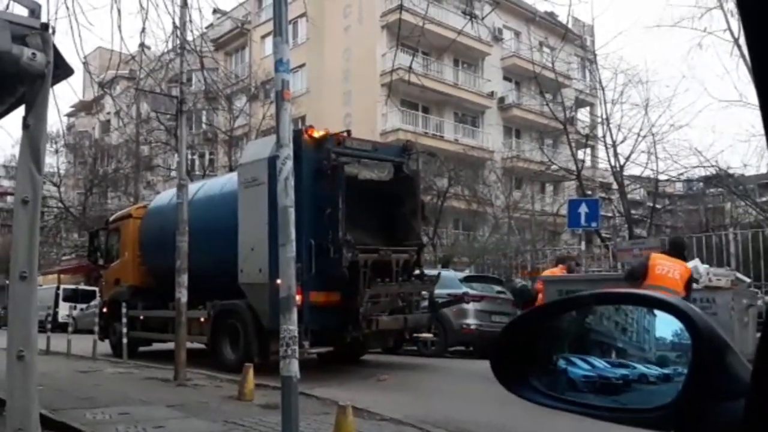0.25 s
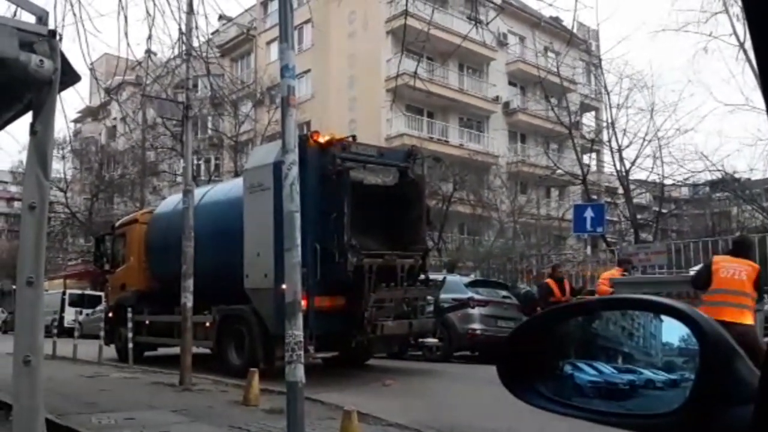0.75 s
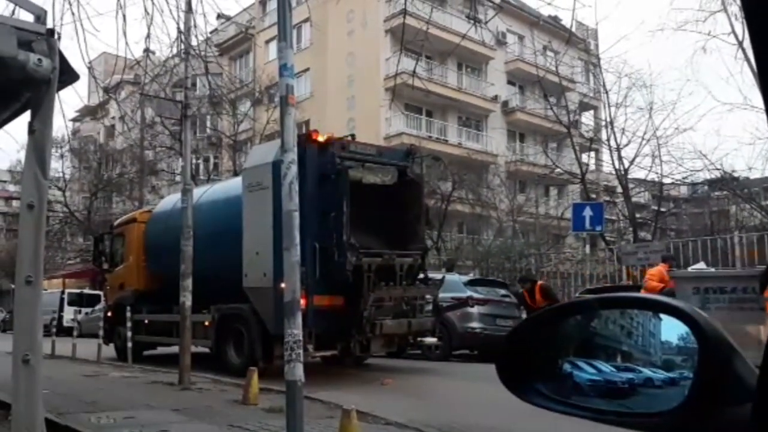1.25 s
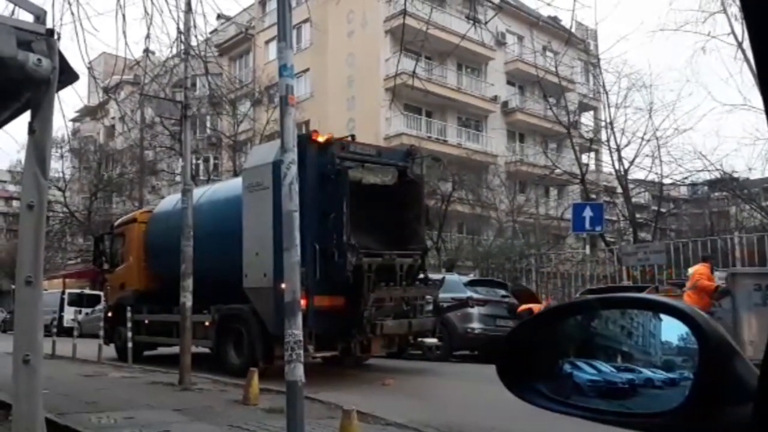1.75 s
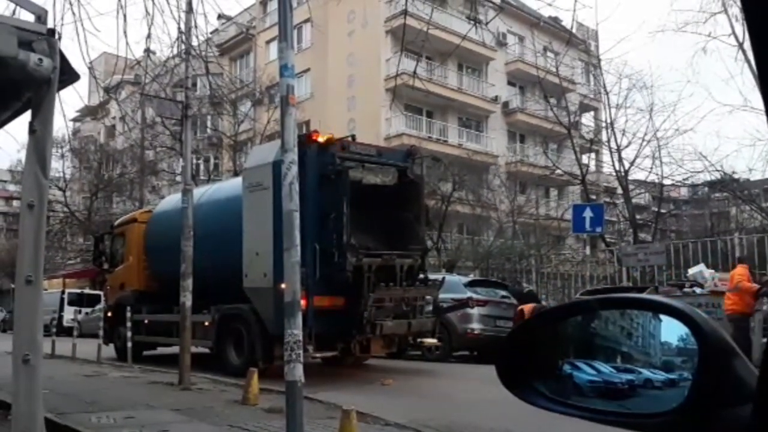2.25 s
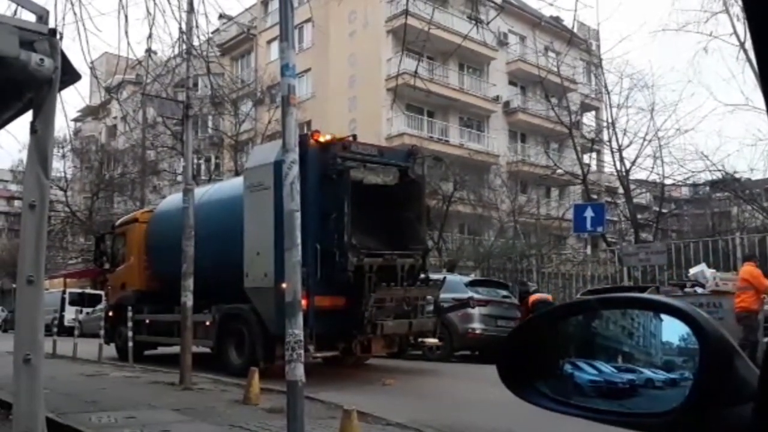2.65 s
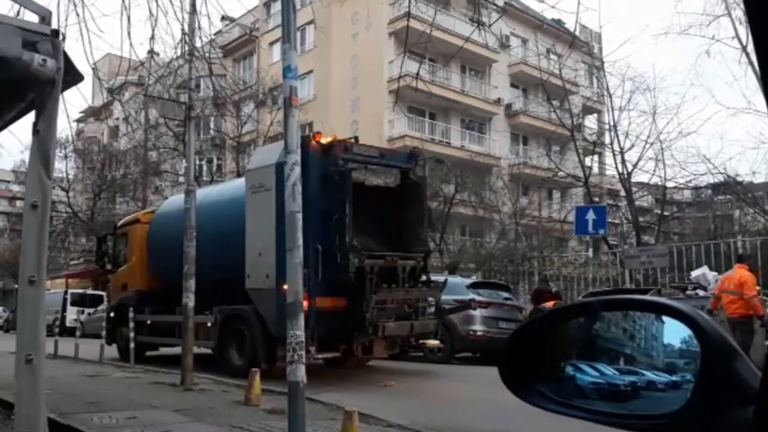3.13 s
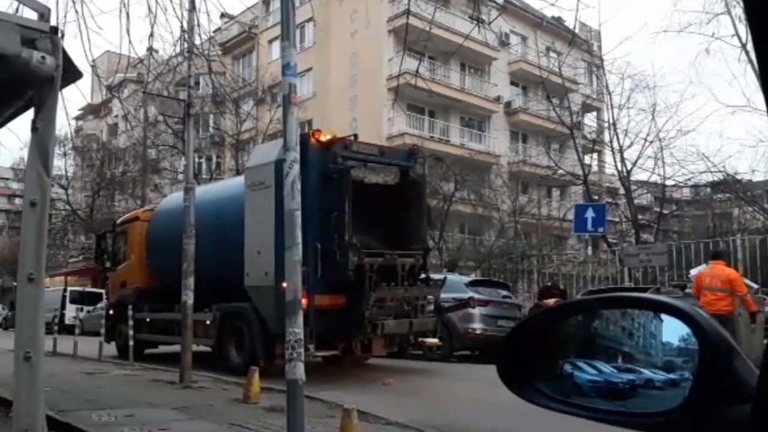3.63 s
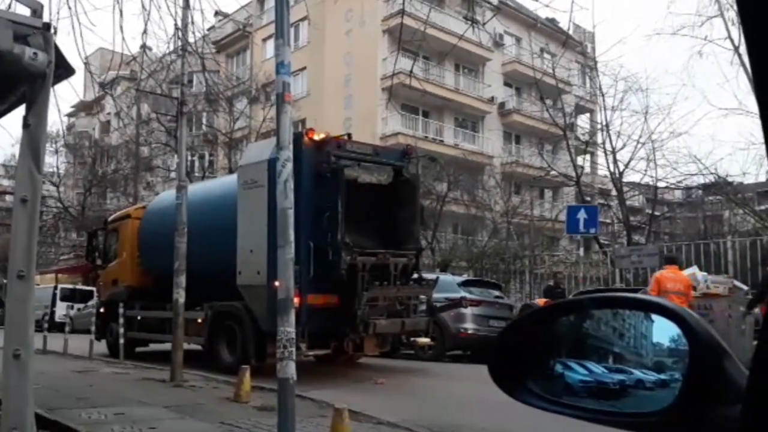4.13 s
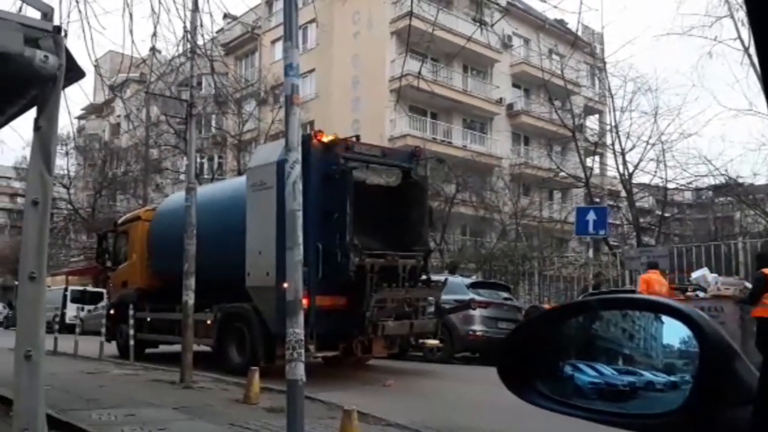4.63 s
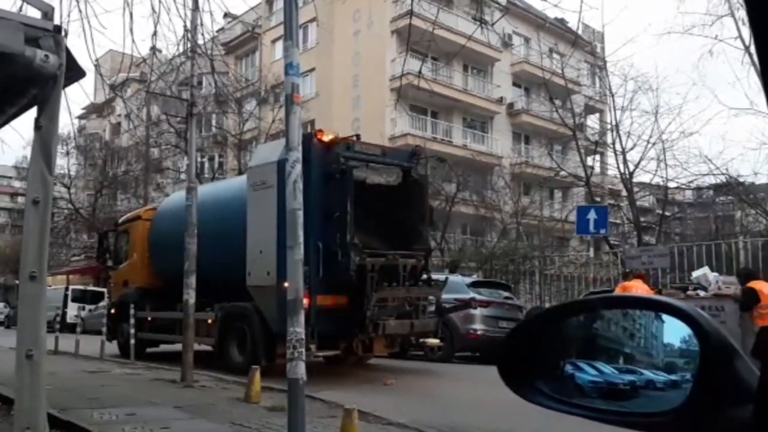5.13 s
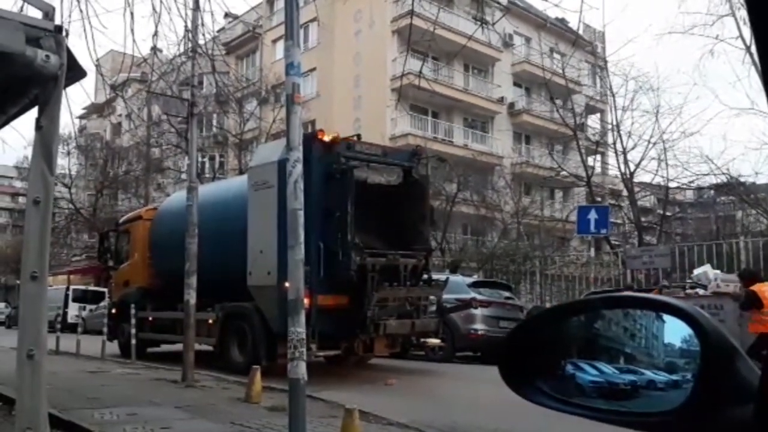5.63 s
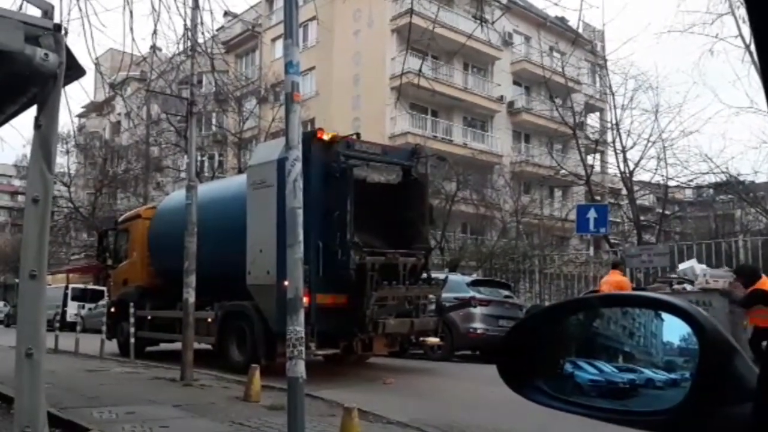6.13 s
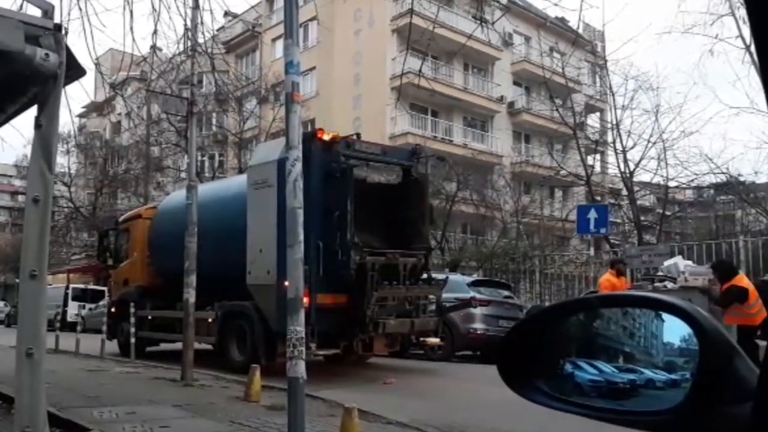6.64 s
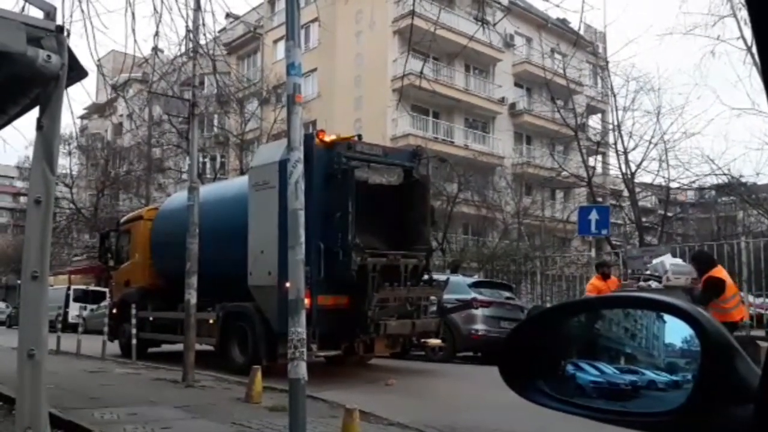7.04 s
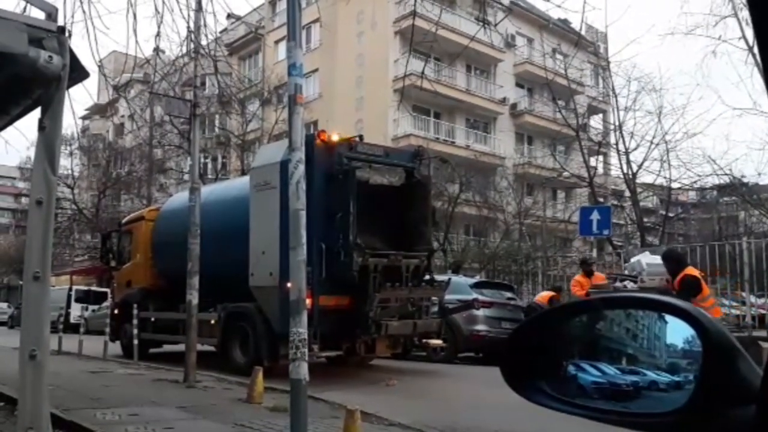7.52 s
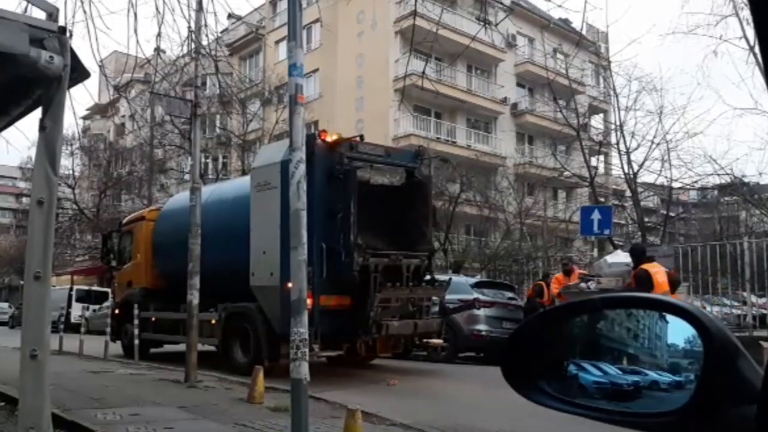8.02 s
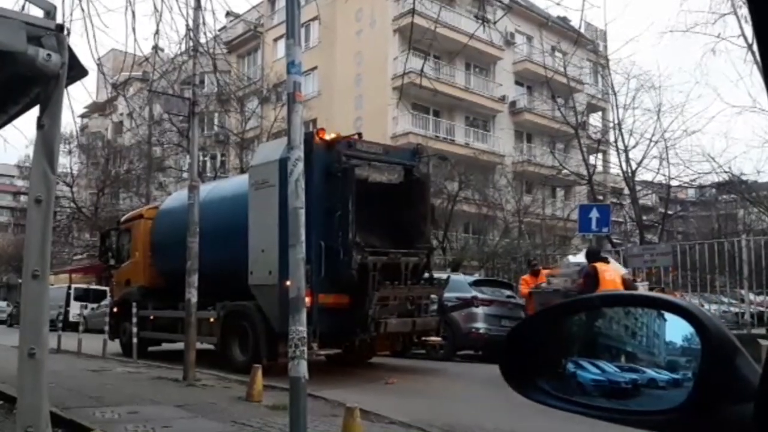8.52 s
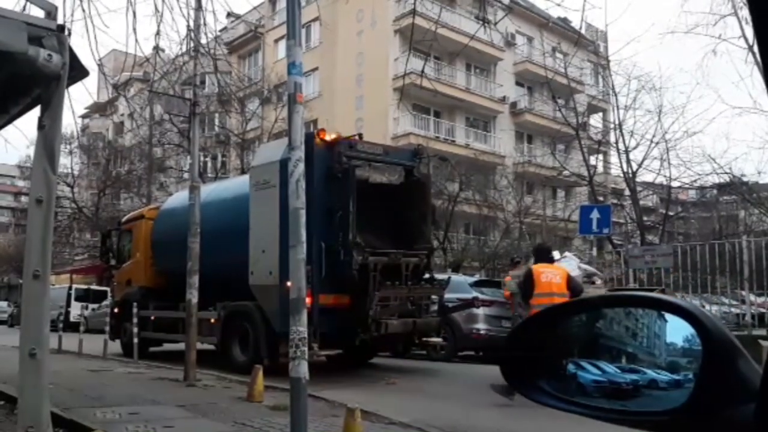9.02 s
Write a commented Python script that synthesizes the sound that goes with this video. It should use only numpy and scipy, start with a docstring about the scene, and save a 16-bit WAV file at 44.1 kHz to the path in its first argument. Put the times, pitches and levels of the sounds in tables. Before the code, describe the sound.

From inside a parked car, a refuse truck's diesel idles steadily, a low uneven boom and rumble with dull clatter and hiss. Soft airy swells come and go. Workers handle metal bins: light taps first, then faint scrapes, squeaks, dull bumps and rustling bags, with a few bird-like chirps. Two hollow clanks stand out late. Short street reflections follow the handling.

```python
"""A diesel's uneven boom fills a parked car as a six-cylinder refuse truck idles in the street.
The boom is a sum of cycle harmonics; filtered noise makes its rumble, the dull clatter and the hiss.
Soft swells of airy noise are brightest near 2 and 4 kHz; wavering sines hum, squeak and chirp like birds.
Scrapes, rustles, taps, bumps and clanks, two of them loud, are noise bursts rung through resonances.
A short diffuse tail follows the handling sounds and the chirps."""
import sys
import numpy as np
from scipy import signal
from scipy.fft import rfft, irfft, next_fast_len
from scipy.io import wavfile
from scipy.ndimage import map_coordinates

SR = 44100
rng = np.random.default_rng(int(sys.argv[2]) if len(sys.argv) > 2 else 0)


def digitize_waveform(pressure):
    """Quantize a signal to 16-bit integers and store it at the path in sys.argv[1].

    Rows of a 2-D input are taken as channels; values are limited to [-1, 1].
    """
    field = np.atleast_2d(pressure).T
    bounded = np.clip(field, -1, 1)
    quanta = np.round(bounded * 32767).astype(np.int16)
    wavfile.write(sys.argv[1], SR, quanta)


N = 408807
T = np.arange(N) / SR
HZ = np.fft.rfftfreq(N, 1 / SR)

# interaural coherence: (frequency [Hz], coherence [0-1])
COHERENCE = [(34, 0.91), (60, 0.98), (160, 0.99), (250, 0.83), (400, 0.3), (900, 0), (2000, 0),
             (4000, 0.02), (8000, 0.01)]
# interaural level difference, left minus right: (frequency [Hz], difference [dB])
EAR_DIFFERENCE = [(34, -2.5), (65, -3.5), (120, -.5), (175, 1), (240, 3.5), (480, 8.5), (800, -1),
                  (2000, 0), (2750, -2.5), (3700, -4.5), (5700, 2.5), (8000, 0)]

# engine cycles per second, and time of the first firing [s]
CYCLE_HZ, FIRST_FIRING_S = 5.6663, .0003
# firing strengths within one cycle, which set the phases of the harmonics: level [dB]
FIRINGS = [-2, -15.5, -1, -4, 0.5, -7.5]
# engine harmonics in the cabin: (multiple of the cycle rate [1], relative level [dB])
HARMONICS = [(6, -8.5), (11, -23.9), (12, -11.6), (15, -22.8), (18, 0.0), (20, -13.5), (21, -0.0),
             (22, -5.7), (23, -8.1), (24, -2.6), (25, -17.6), (26, -20.6), (27, -15.8), (28, -20.3),
             (29, -7.5), (30, -5.2), (31, -14.4), (32, -18.6), (33, -19.5), (36, -12.9), (38, -23.9),
             (39, -19.5), (42, -21.2), (45, -21.7), (47, -21.8)]
# air resonances of the cabin: (frequency [Hz], width [Hz])
CABIN_MODES = [(95, 17), (145, 30.4)]
# exhaust rumble before its gain: (frequency [Hz], density [dB per Hz])
RUMBLE_SPECTRUM = [(15, -91.5), (38, -80.5), (52, -67.5), (66, -67.5), (85, -68), (115, -59.5),
                   (165, -62.5), (200, -65), (250, -72.5), (300, -74.5), (380, -77.5), (520, -86),
                   (700, -101), (1100, -125)]

# notes of pumps and other driven parts: (frequency [Hz], mean level [dB], left minus right [dB])
DRIVEN_NOTES = [(61.2, -53, -2), (219.5, -56, 7.5), (243.6, -62, 4.5), (266, -64.5, -0.5), (477.8, -69, 9)]

# clatter and hiss before resonances and gain: (frequency [Hz], density [dB per Hz])
STREET_SPECTRUM = [(400, -92), (600, -85.5), (720, -92), (900, -95.5), (1150, -103), (1500, -106),
                   (1950, -109), (3200, -107), (4100, -110), (4700, -113.5), (6500, -117), (7600, -119),
                   (11000, -116), (15500, -116)]
# narrow resonances of the outside sound: (frequency [Hz], width [Hz], boost [dB])
OUTSIDE_MODES = [(870, 87, 4.5), (1020, 31, 3.5), (1734, 62, 7), (2290, 71, 4), (2745, 64, 6.5),
                 (2960, 52, 1.5), (3250, 130, 2), (4060, 180, 3.5)]

# soft swells of airy noise: (start [s], length [s], level [dB])
NOISE_SWELLS = [(0, 0.55, -72.5), (0.698, 0.92, -63), (1.8, .5, -65), (3.202, 0.91, -61), (4.3, 0.55, -71),
                (5.91, 0.49, -67.5), (6.6, 0.74, -75), (8.118, 0.62, -65)]
# share of its length at which a swell is loudest, and constant level beneath the swells [dB]
PEAK_SHARE, FLOOR_DB = .3, -80
# broad spectrum of the airy noise: (frequency [Hz], relative density [dB])
AIRY_SPECTRUM = [(300, -2.5), (900, 8), (1250, -10.5), (2100, -1.5), (3000, -5.5), (4100, -5.5),
                 (5000, -14.5), (6700, -18.5), (7300, -40)]
# resonances of the airy noise: (frequency [Hz], width [Hz], boost [dB])
SWELL_RESONANCES = [(1360, 590, 4.5), (2050, 230, 5), (3920, 300, 7.5)]

# steel on steel: (time [s], level [dB], centre [Hz], decay [s], left minus right [dB])
STEEL_SCRAPES = [(.055, -68, 3200, .06, -3), (.77, -66.5, 2800, 0.086, -5), (.849, -65, 3020, .035, -8),
                 (1.10, -67, 4400, .04, -3), (2.015, -60, 2650, 0.059, -3), (2.33, -69.5, 3080, 0.82, -4),
                 (2.701, -65.5, 2980, 0.068, -1), (2.80, -66, 3200, .04, -5), (2.98, -70, 3600, .03, -3),
                 (3.225, -58, 3300, 0.076, -2.5), (3.465, -66, 2800, 0.073, 1.5),
                 (3.689, -64, 3070, 0.038, 1), (4.515, -64.5, 2600, 0.063, -4),
                 (5.882, -62, 3220, 0.043, -5), (7.09, -64.5, 2900, 0.036, -4),
                 (7.2, -72, 3200, .055, -4.5), (7.79, -72, 3900, .15, -8), (8.51, -62.5, 3370, 0.058, -5)]
# swell time, bandwidth (standard deviation in power) and upper cutoff of every scrape
SCRAPE_RISE_S, SCRAPE_OCTAVES, SCRAPE_TOP_HZ = 0.018, .28, 4430
# high rustles, as of rubbish bags shifting: (time [s], level [dB], swell [s])
BAG_RUSTLES = [(1.24, -76, 0.063), (1.72, -79, 0.037), (1.88, -79, .06), (4.3, -76, 0.13),
               (4.52, -68.5, 0.028), (6.5, -78, .33), (7.88, -75, .03), (8.495, -68.5, 0.02)]
# centre, bandwidth (standard deviation in power) and decay/swell ratio of every rustle
RUSTLE_HZ, RUSTLE_OCTAVES, RUSTLE_FADE_RATIO = 5870, 0.29, 3.4

# light taps of lids and handles: (time [s], level [dB], decay [s], left minus right [dB])
LID_TAPS = [(.315, -62, 0.068, 0), (.429, -55.5, 0.026, 4), (4.1, -72, .04, -2), (4.821, -72, .02, -1),
            (5.78, -72, .02, -11)]
# spectrum of a tap: (frequency [Hz], relative density [dB])
TAP_SPECTRUM = [(400, -3.5), (900, 4), (1300, -5.5), (1700, 4), (2300, -7.5), (4000, -5.5), (6300, -11.5),
                (7500, -22)]
# dull bumps on the road: (time [s], level [dB], centre [Hz], decay [s])
ROAD_BUMPS = [(1.495, -50, 380, 0.033), (2.268, -53, 655, 0.075), (3.095, -50.5, 384, 0.046),
              (3.24, -59.5, 766, 0.21), (3.33, -52.5, 359, 0.25), (3.505, -47, 361, 0.026),
              (3.79, -60, 580, .03), (4.447, -50, 355, .03), (6.935, -64, 636, 0.027),
              (8.325, -54, 410, 0.035), (9.035, -49.5, 367, 0.032)]
# bins knocking together: (time [s], level [dB], decay [s])
BIN_CLANKS = [(2.262, -58, 0.065), (5.885, -57, 0.064), (7.088, -56.5, 0.026), (7.394, -48, 0.06),
              (7.494, -58.5, 0.051), (8.024, -45, 0.044)]
# broad spectrum of a clank: (frequency [Hz], relative density [dB])
CLANK_SPECTRUM = [(200, -15.5), (600, 7), (1050, 0.5), (1400, -5.5), (2000, -10), (3000, -6.5),
                  (3900, -14.5), (5000, -26.5), (6500, -31), (8000, -42.5)]
# bin resonances: (frequency [Hz], width [Hz], boost [dB])
BIN_RESONANCES = [(557, 37, 8), (905, 29, 12.5), (972, 31, 6.5), (1574, 89, 7.5), (2315, 170, 7),
                  (2700, 130, -1.5), (2670, 60, 9), (3200, 110, 4)]

# thin chirps: (time of top [s], rise [s], fall [s], top pitch [Hz], level [dB], pitch sag [share])
THIN_CHIRPS = [(.788, .05, .03, 6700, -76, .09), (1.212, 0.028, .06, 6300, -72, .04),
               (1.295, .06, 0.15, 6530, -78, .035), (3.568, .17, .095, 6810, -59.5, .095)]
# level change from the top of a chirp towards its ends [dB]
CHIRP_FADE_DB = -18.5

# metal squeaks: (time [s], length [s], pitch [Hz], level [dB],
# octave relative to fundamental [dB], left minus right [dB], rms pitch jitter [share])
METAL_SQUEAKS = [(2.257, 0.092, 2934, -59.5, -1.5, 7, .004), (2.269, 0.092, 2927, -61, -41, 0, 0.02),
                 (3.212, .04, 4260, -63, -45.5, -8, .014), (4.46, 0.061, 2020, -75.5, -40, 1, .012),
                 (5.75, .099, 2740, -73, -30, -13, .003), (6.029, 0.06, 2740, -63, -45, -16, .003),
                 (6.498, .08, 2830, -83, 8, 1, .004)]


def amp(db):
    """Logarithmic level: turns decibels into an amplitude ratio."""
    return 10 ** (np.asarray(db) / 20)


def unit(x):
    """Root-mean-square normalization: scales a signal to rms 1."""
    return x / np.sqrt(np.mean(x ** 2) + 1e-20)


def read(points, hz):
    """Logarithmic frequency scale: joins (Hz, value) points by straight lines on it."""
    f, value = np.transpose(points)
    return np.interp(np.log(hz + 1), np.log(f + 1), value)


def pan(db):
    """Level-difference stereo: splits a left-minus-right difference equally in dB."""
    return amp(np.array([[.5], [-.5]]) * db)


def peaks(modes, hz):
    """Resonance: sums bell-shaped boosts in dB, each with its centre and width."""
    return sum(db / (1 + (2 * (hz - f) / width) ** 2) for f, width, db in modes)


def bell(hz, centre, octaves):
    """Band-limiting: a Gaussian band in octaves, in dB; the width is its standard deviation in power."""
    distance = np.log2((hz + 1) / centre)
    gain = np.exp(-(distance / octaves / 2) ** 2)
    return 20 * np.log10(gain + 1e-5)


def drift(rate_hz):
    """Random modulation: splined noise of rms 1, moving at about the given rate in 32-sample steps."""
    knots = rng.standard_normal(16384)
    places = np.arange(N // 32 + 1) * 64 * rate_hz / SR
    curve = map_coordinates(knots, [places], order=3, mode="wrap")
    return unit(curve).repeat(32)[:N]


def noise(db):
    """Partial coherence: shapes noise to a density (dB per Hz on HZ), its ears alike by frequency."""
    size = next_fast_len(N)
    hz = np.fft.rfftfreq(size, 1 / SR)
    a, b = rfft(rng.standard_normal((2, size))) * np.sqrt(SR / 2)
    same = np.clip(read(COHERENCE, hz), -1, 1)
    right = same * a + np.sqrt(1 - same ** 2) * b
    pair = np.array([a, right]) * pan(read(EAR_DIFFERENCE, hz))
    return irfft(pair * amp(np.interp(hz, HZ, db)), size)[:, :N]


def add(mix, s, sound):
    """Superposition: adds a stereo sound at a time in seconds."""
    part = mix[:, max(round(s * SR), 0):][:, :sound.shape[1]]
    part += sound[:, :part.shape[1]]


def rattle(colour_db, rise, decay, grain_db):
    """Impact excitation: a noise burst swells, decays and rings through a minimum-phase spectrum."""
    t = np.arange(SR) / SR
    # random strength for each 128-sample grain
    size = amp(grain_db * rng.standard_normal(SR // 128 + 1)).repeat(128)[:SR]
    decay_curve = np.exp(-np.maximum(t - rise, 0) / decay)
    swell = np.minimum(t / rise, 1) * decay_curve * (1 - t ** 4)
    impacts = unit(rng.standard_normal((2, SR)) * size) * swell
    # the colour has one value per whole Hz; minimum phase lets it ring only after the impact
    log_gain = np.log(unit(amp(np.maximum(colour_db, -70))))
    mirrored = np.r_[log_gain, log_gain[-2:0:-1]]
    causal = np.conj(signal.hilbert(mirrored))[:len(log_gain)]
    return irfft(rfft(impacts) * np.exp(causal), SR)


def engine(wander=.0012, throb=0.16, tones_db=-33.63, rumble_db=-0.72, swell_db=0.1):
    """Periodic excitation: six uneven firings phase the harmonics, whose envelope pulses the rumble."""
    # wander is in engine cycles, rms
    turns = CYCLE_HZ * (T - FIRST_FIRING_S) + wander * drift(rate_hz=1.0)
    place = np.arange(len(FIRINGS)) / len(FIRINGS)
    cycle = np.linspace(0, 1, 2048)
    boom = np.zeros((2, len(cycle)))
    for k, db in HARMONICS:
        hz = k * CYCLE_HZ
        firing_phase = np.angle(np.sum(amp(FIRINGS) * np.exp(-2j * np.pi * k * place)))
        # the cabin holds back tones near its resonances, so each firing rings on
        lag = sum(2 * np.arctan2(hz * width, f ** 2 - hz ** 2) for f, width in CABIN_MODES)
        # less coherent harmonics reach the two ears further out of step
        skew = np.arccos(np.clip(read(COHERENCE, hz), -1, 1)) * (-1) ** k * np.array([[.5], [-.5]])
        wave = np.cos(2 * np.pi * k * cycle + firing_phase - lag + skew)
        boom += amp(db) * pan(read(EAR_DIFFERENCE, hz)) * wave
    tones = unit(np.array([np.interp(turns % 1, cycle, ear) for ear in boom]))
    envelope = unit(abs(signal.hilbert(boom[0])))
    puffs = np.interp(turns % 1, cycle, envelope)
    rumble = noise(read(RUMBLE_SPECTRUM, HZ)) * unit(1 - throb + throb * puffs)
    load = amp(swell_db * drift(rate_hz=0.98))
    return load * (amp(tones_db) * tones + amp(rumble_db) * rumble)


def whine(waver=.0015, flutter_db=2):
    """Rotational tone: pumps and other driven parts are sines that waver in pitch and level."""
    out = np.zeros((2, N))
    for hz, db, side in DRIVEN_NOTES:
        turns = np.cumsum(hz * (1 + waver * drift(rate_hz=3))) / SR
        level = amp(db + flutter_db * drift(rate_hz=2))
        out += pan(side) * level * unit(np.sin(2 * np.pi * turns))
    return out


def street(level_db=-1.0, flutter_db=1.22):
    """Amplitude modulation: low-passed engine clatter flutters, while the high hiss stays smooth."""
    hiss = noise(read(STREET_SPECTRUM, HZ) + peaks(OUTSIDE_MODES, HZ))
    lowpass = signal.butter(2, 4500, fs=SR, output="sos")
    clatter = signal.sosfiltfilt(lowpass, hiss)
    flutter = amp(flutter_db * drift(rate_hz=12)) - 1
    return amp(level_db) * (hiss + clatter * flutter)


def noise_swells(slow_db=2.5, fast_db=1.5):
    """Enveloped noise: soft swells of airy noise, brightest near 2 and 4 kHz, rise faster than they fall."""
    power = amp(FLOOR_DB) ** 2
    for s, length, db in NOISE_SWELLS:
        ramp = np.interp((T - s) / length, [0, PEAK_SHARE, 1], [0, 1, 0])
        power = power + amp(db) ** 2 * np.sin(np.pi / 2 * ramp) ** 2 * ramp
    roughness = unit(amp(slow_db * drift(rate_hz=8.2) + fast_db * drift(rate_hz=130)))
    airy = unit(noise(read(AIRY_SPECTRUM, HZ) + peaks(SWELL_RESONANCES, HZ)))
    return np.sqrt(power) * roughness * airy


def rubbing(rustle_side_db=1.0):
    """Friction noise: steel scrapes and bags rustle, filtered by their way in through the window."""
    out, hz = np.zeros((2, N)), np.fft.rfftfreq(SR, 1 / SR)
    glass = 0.84 * peaks(OUTSIDE_MODES, hz) - 10 * np.log10(1 + (hz / 6850) ** 50)
    steel = glass - 10 * np.log10(1 + (hz / SCRAPE_TOP_HZ) ** 18)
    for s, db, centre, decay, side in STEEL_SCRAPES:
        colour = bell(hz, centre, SCRAPE_OCTAVES) + steel
        scrape = rattle(colour, SCRAPE_RISE_S, decay, grain_db=1.0)
        add(out, s, amp(db) * pan(side) * scrape)
    bags = bell(hz, RUSTLE_HZ, RUSTLE_OCTAVES) + glass
    for s, db, swell in BAG_RUSTLES:
        rustle = rattle(bags, swell, RUSTLE_FADE_RATIO * swell, grain_db=2.5)
        add(out, s, amp(db) * pan(rustle_side_db) * rustle)
    return out


def echoes(x, t60=0.41, wet_db=-10):
    """Diffuse reflection: house fronts return a tail of noise that decays 60 dB in t60 seconds."""
    t = np.arange(SR // 2) / SR
    tail = rng.standard_normal((2, len(t))) * amp(-60 * t / t60) * (t > .004)
    tail = tail / np.linalg.norm(tail[0])
    return x + amp(wet_db) * signal.fftconvolve(x, tail, axes=1)[:, :N]


def bins(clank_side_db=-1, bump_side_db=4.5):
    """Modal ringing: impact noise excites tapped lids and handles, bumped bins and clanking steel."""
    out, hz = np.zeros((2, N)), np.fft.rfftfreq(SR, 1 / SR)
    tap_colour = read(TAP_SPECTRUM, hz)
    for s, db, decay, side in LID_TAPS:
        tap = rattle(tap_colour, rise=0.0037, decay=decay, grain_db=4.0)
        add(out, s, amp(db) * pan(side) * tap)
    for s, db, centre, decay in ROAD_BUMPS:
        bump = rattle(bell(hz, centre, octaves=0.27), rise=0.0095, decay=decay, grain_db=-2)
        add(out, s, amp(db) * pan(bump_side_db) * bump)
    steel = read(CLANK_SPECTRUM, hz) + peaks(BIN_RESONANCES, hz)
    for s, db, decay in BIN_CLANKS:
        clank = rattle(steel, rise=.012, decay=decay, grain_db=0.5)
        add(out, s, amp(db) * pan(clank_side_db) * clank)
    return out


def chirps(jitter=.005, side_db=-6, top_width=0.44):
    """Frequency modulation: one arch steers both pitch and loudness of a near-pure whistle."""
    out = np.zeros((2, N))
    for s, rise, fall, hz, db, sag in THIN_CHIRPS:
        t = np.arange(-rise, fall, 1 / SR)
        # 0 at the top of the chirp, 1 at either end
        away = np.maximum(-t / rise, t / fall)
        arch = np.exp(-(away / top_width) ** 2)
        pitch = hz * (1 - sag * (1 - arch)) * (1 + jitter * drift(rate_hz=110)[:len(t)])
        whistle = unit(np.sin(2 * np.pi * np.cumsum(pitch) / SR))
        level = amp(db + CHIRP_FADE_DB * (1 - arch)) * (1 - away ** 8)
        add(out, s - rise, pan(side_db) * level * whistle)
    return out


def squeaks(flutter_db=3, rasp=0.18):
    """Stick-slip friction: dry metal sounds an unsteady, rasping note with its octave."""
    out = np.zeros((2, N))
    for s, length, hz, db, octave_db, side, jitter in METAL_SQUEAKS:
        n = round(length * SR)
        pitch = hz * (1 + jitter * drift(rate_hz=110)[:n])
        phase = 2 * np.pi * np.cumsum(pitch) / SR
        grip = amp(flutter_db * drift(rate_hz=46)[:n]) * (1 + rasp * drift(rate_hz=380)[:n])
        note = (np.sin(phase) + amp(octave_db) * np.sin(2 * phase)) * grip
        swell = np.sin(np.pi * np.arange(n) / n)
        add(out, s, pan(side) * amp(db) * unit(note) * swell)
    return out


def scene():
    """Superposition: sums truck, street and airy swells with the echoed handling sounds and chirps."""
    steady = engine() + whine() + street()
    return steady + noise_swells() + echoes(rubbing() + bins() + chirps() + squeaks())


def record(dry):
    """Band limitation: the recorder's linear-phase low-pass at 15750 Hz."""
    lowpass = signal.firwin(511, 15750, window=("kaiser", 9), fs=SR)
    return signal.oaconvolve(dry, lowpass[None], "same")


dry = scene()
out = record(dry)
digitize_waveform(out)
```